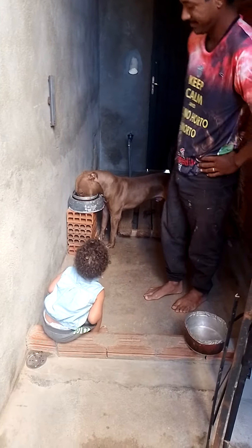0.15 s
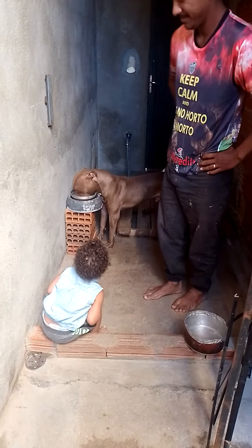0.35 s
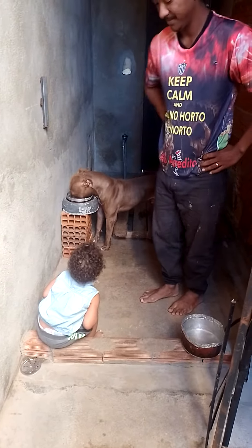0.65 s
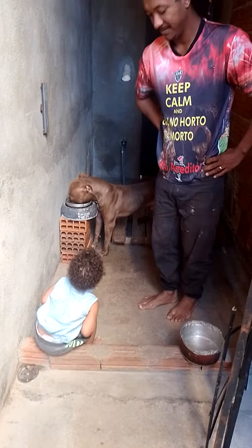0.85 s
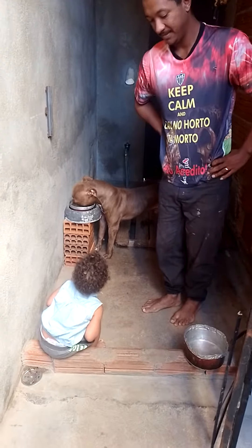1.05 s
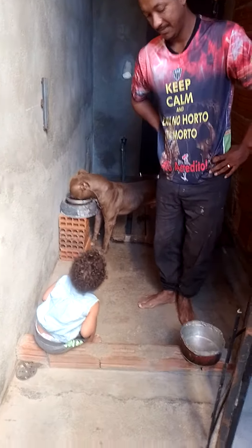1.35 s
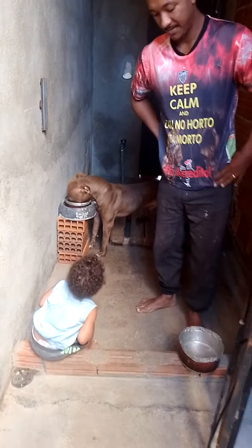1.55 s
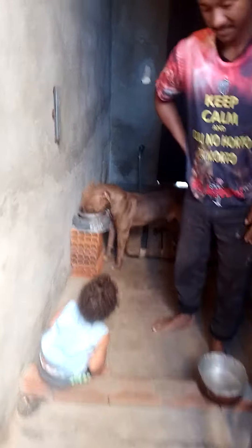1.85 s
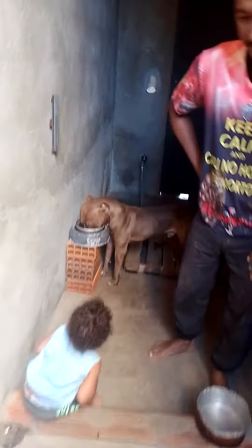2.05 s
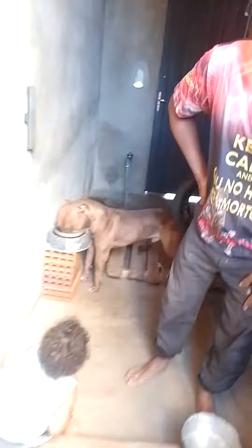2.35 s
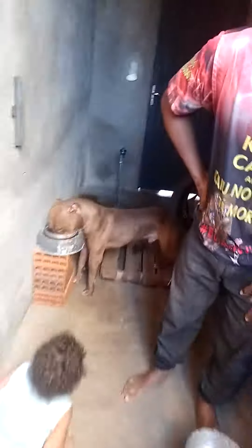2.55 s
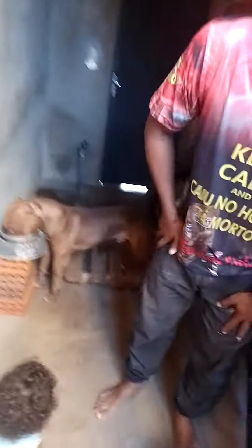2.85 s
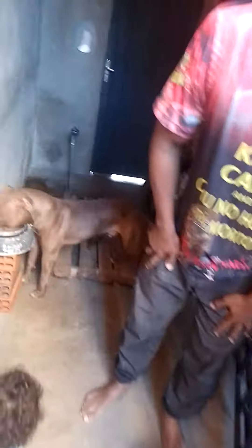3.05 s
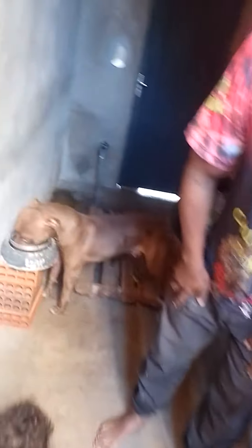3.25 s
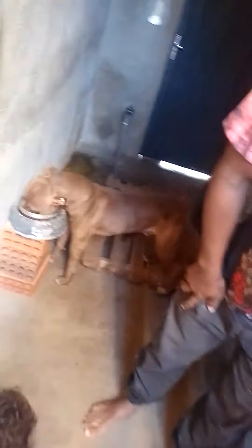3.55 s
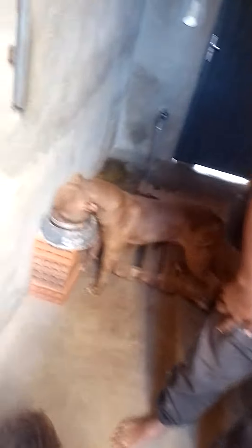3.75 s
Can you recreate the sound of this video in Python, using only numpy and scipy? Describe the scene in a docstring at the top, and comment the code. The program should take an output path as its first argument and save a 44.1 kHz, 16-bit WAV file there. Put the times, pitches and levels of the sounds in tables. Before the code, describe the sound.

Dry pellets crunch, snap and scrape as a dog eats from a metal bowl, which rings briefly and clatters on a brick. The eating eases, then grows busier, heard a few metres away in a quiet concrete yard.

```python
"""Dog rooting through kibble

A muzzle pushes dry pellets around a metal bowl on a hollow brick, in a walled concrete yard.
The pellets crunch in dense grains, rub the bowl into ringing, snap singly and ping on the rim;
the bowl knocks and chatters on the brick. A mono phone a few metres away also picks up
faint hiss, wind and handling rumble, and one finger tap."""
import sys
import numpy as np
from scipy import signal
from scipy.fft import rfft, irfft
from scipy.io import wavfile
from scipy.ndimage import uniform_filter1d

SR = 44100
rng = np.random.default_rng(int(sys.argv[2]) if len(sys.argv) > 2 else 0)


def transcribe(u):
    """Save the signal u as a 16-bit wav file named by the first command-line argument.

    u: samples, shape (n,) or (channels, n), limited to [-1, 1]; the rate is SR.
    q: integer samples, one column per channel.
    """
    v = np.clip(np.atleast_2d(u).T, -1, 1)
    q = np.round(v * 32767).astype(np.int16)
    wavfile.write(sys.argv[1], SR, q)


N = 171990


def undb(db):
    return 10 ** (np.asarray(db) / 20)


def unit(x):
    return x / np.sqrt(np.mean(x ** 2))


def unit_onset(x, onset_s):
    """Scale to RMS 1 over the first onset_s."""
    return x / np.sqrt(np.mean(x[:int(onset_s * SR)] ** 2))


def band(x, lo_hz, hi_hz, order=2):
    sos = signal.butter(order, [lo_hz, min(hi_hz, SR / 2.2)], "band", fs=SR, output="sos")
    return signal.sosfilt(sos, x)


def colour(x, spectrum):
    """Shape to (f/Hz, gain/dB) points; RMS 1."""
    hz, db = np.array(spectrum).T
    bins_hz = np.maximum(np.arange(len(x) // 2 + 1) * SR / len(x), 1)
    gain_db = np.interp(np.log(bins_hz), np.log(hz), db, left=-80)
    return unit(irfft(rfft(x) * undb(gain_db), len(x)))


def grains(n, per_s, spread_db):
    """Random clicks, a few much larger than the rest."""
    clicks = (rng.random(n) < per_s / SR) * rng.standard_normal(n)
    return clicks * undb(spread_db * np.minimum(rng.exponential(size=n), 5))


def fade(n, t60_s):
    return np.exp(-np.log(1000) * np.arange(n) / SR / max(t60_s, 1e-3))


def drift(rate_hz):
    """Smooth random wander; RMS 1."""
    hold = int(SR / rate_hz)
    steps = np.repeat(rng.standard_normal(N // hold + 1), hold)
    return unit(uniform_filter1d(uniform_filter1d(steps, hold), hold)[:N])


def add(out, at_s, x):
    i = int(at_s * SR)
    out[i:i + len(x)] += x[:N - i]


def crowded_modes(envelope, spacing_hz=90, depth_db=3.5, drift_db=7):
    """Noise coloured by the bowl's dense upper modes; five sets take turns as the muzzle moves."""
    bins_hz = np.arange(N // 2 + 1) * SR / N
    grid_hz = np.arange(0, SR / 2, spacing_hz)
    out, power = 0, 0
    for _ in range(5):
        share = undb(drift_db * drift(rate_hz=7.976))
        peaks = np.clip(rng.standard_normal(len(grid_hz)), -2, 1.5)
        ripple = undb(depth_db * np.interp(bins_hz, grid_hz, peaks))
        noise = envelope * rng.standard_normal(N)
        out += share * unit(irfft(rfft(noise) * ripple, N))
        power += share ** 2
    return out / np.sqrt(power)


# Bowl modes: f/Hz, level/dB, t60/s
BOWL_MODES = [(434, 2, 0.18), (485, 0, 0.15), (522, -3, 0.15), (600, -1, 0.13), (652, 0, 0.12),
              (746, 1.5, 0.08), (860, 1, 0.12), (960, 2, 0.12), (1136, 2.5, 0.068), (1320, 2.5, 0.015),
              (1383, -3.5, 0.02), (1580, 8, 0.042), (1642, 6, .1), (1740, -2.5, 0.013), (1995, -5, 0.12),
              (2240, -23, 0.016)]
LOW_TOP_HZ, MID_TOP_HZ = 690, 1350


def bowl(force, group, offsets_db, detunes, t60_scale):
    """A force rings the low (0), mid (1) or high (2) modes; the deep bass is removed."""
    out = 0
    for (hz, db, t60_s), offset_db, detune in zip(BOWL_MODES, offsets_db, detunes):
        if int(hz > LOW_TOP_HZ) + int(hz > MID_TOP_HZ) == group:
            radius = np.exp(-np.log(1000) / (max(t60_s * t60_scale, 0.005) * SR))
            angle = 2 * np.pi * hz * (1 + detune) / SR
            gain = rng.choice([-1, 1]) * undb(db + offset_db) * np.sqrt(1 - radius) * np.sin(angle)
            out += gain * signal.lfilter([1], [1, -2 * radius * np.cos(angle), radius ** 2], force)
    return signal.sosfilt(signal.butter(4, 340, "high", fs=SR, output="sos"), out)


# Crunch spectrum: f/Hz, gain/dB
CRUNCH_SPECTRUM = [(710, -35.5), (1200, -5.5), (1620, -15), (1750, -6.5), (2520, -4.5), (2900, -3.5),
                   (3590, -4), (4720, -2), (5750, -2), (6520, -2), (7280, -5.5), (7880, -43), (10200, -58),
                   (17300, -120)]
# Muzzle pushes: t/s, crunch level/dB, mid ring/dB re crunch, high ring/dB re crunch
MUZZLE_PUSHES = [(0.0, -42.5, -5, -28), (0.08, -49, -9.5, -8), (0.1, -42, -17, -25.5),
                 (0.191, -54.5, -18, -4), (0.22, -38, -3, -24), (0.25, -36.5, -4, -3.5),
                 (0.35, -44.5, -9, -11), (0.385, -57.5, -15, -8), (0.41, -47.5, -20, -15),
                 (0.499, -49, -14.5, -12.5), (0.598, -29.5, -20, -23), (0.67, -36, -8, -9),
                 (0.72, -43, -13, -12), (0.75, -54.5, -3.5, -7.5), (0.93, -59.5, -13, -10.5),
                 (0.98, -71, -3, -13), (1.055, -80, 1, -2), (1.065, -61, 4, -23), (1.14, -51, -10, -27),
                 (1.181, -68.5, -8, -23), (1.27, -45.5, -11.5, -9.5), (1.408, -37, -4, -14),
                 (1.5, -53, -5, -14), (1.54, -47, -2.5, -8), (1.65, -57.5, -11.5, -13),
                 (1.68, -47, -9.5, -44), (1.7, -46.5, -13.5, -10), (1.74, -44.5, -7.5, -5),
                 (1.77, -39, -11, -16), (1.932, -50.5, -13, -13), (2.03, -31, -18, -10.5),
                 (2.06, -34, -15, -10), (2.1, -28.5, 3, -20), (2.13, -36, -11, -16),
                 (2.19, -41.5, -6.5, -5.5), (2.313, -61.5, -3, -6), (2.319, -45, -13.5, -6.5),
                 (2.36, -47, -11, -1), (2.41, -44, -16, -13), (2.471, -58.5, -13, -12),
                 (2.512, -38.5, -9, -8), (2.57, -42.5, -23, -16), (2.62, -37.5, -20, -20),
                 (2.7, -57, -3.5, -5), (2.75, -47, -10.5, -3.5), (2.85, -55, -12, -10),
                 (2.87, -44.5, -12.5, -2.5), (2.99, -41.5, -9.5, -13), (3.04, -52.5, -4, 1),
                 (3.119, -40.5, -16.5, -8), (3.159, -52.5, -11, -1.5), (3.202, -43.5, 3, -10),
                 (3.21, -34.5, -5.5, -4), (3.24, -26, -13, -12), (3.261, -35, -5, -27),
                 (3.282, -29, -8.5, -10), (3.442, -46, -10.5, -7), (3.462, -34, -12, -14.5),
                 (3.617, -50.5, -7, 6), (3.626, -34.5, -15.5, -2), (3.66, -33.5, -16, -8),
                 (3.701, -31.5, -15.5, -5.5), (3.78, -42.5, -9, -12), (3.9, -42, -8, -6.5)]


def rooting(grain_s=0.0017, mid_cap_db=-3, low_re_mid_db=-5.5):
    """Pellets crunch and rub the bowl into a ring that they and the muzzle damp."""
    t = np.arange(N) / SR
    times_s, *levels_db = np.array(MUZZLE_PUSHES).T
    crunch_db, mid_db, high_db = (np.interp(t, times_s, column) for column in levels_db)
    contacts = lambda: grains(N, per_s=4000, spread_db=2.5)
    rattle = unit(uniform_filter1d(np.abs(contacts()), size=int(grain_s * SR) + 1))
    even = np.zeros(len(BOWL_MODES))
    low, mid, high = (unit(bowl(contacts(), group, even, even, t60_scale=0.23)) for group in range(3))
    crunch = colour(crowded_modes(rattle + 1), CRUNCH_SPECTRUM)  # grains on a steady bed
    lower_ring = undb(np.minimum(mid_db, mid_cap_db)) * (mid + undb(low_re_mid_db) * low)
    return undb(crunch_db) * (crunch + lower_ring + undb(high_db) * high)


# Yard hiss spectrum: f/Hz, gain/dB
HISS_SPECTRUM = [(15, -50.5), (25, -12.5), (97, -12.5), (186, -11), (362, -2.5), (428, 0.5), (690, -4.5),
                 (741, -9), (900, -10.5), (1350, 0.5), (1700, -30), (5370, -38), (7500, -51.5), (9750, -81),
                 (16500, -120)]


def yard_hiss(level_db=-65, flicker_db=0.5):
    """Faint, dull outdoor noise."""
    hiss = colour(rng.standard_normal(N), HISS_SPECTRUM)
    return hiss * undb(level_db + flicker_db * drift(rate_hz=16))


# Rumble envelope: t/s, level/dB
RUMBLE_LEVELS = [(0.0, -85), (0.24, -73.5), (0.71, -62), (0.93, -65), (1.09, -65), (1.78, -74.5),
                 (1.92, -72.5), (2.18, -55.5), (2.709, -72), (3.33, -60), (3.41, -58), (3.9, -59.5)]


def rumble(centre_hz=82.4, flicker_db=3):
    """Low, unsteady noise of wind and handling."""
    level_db = np.interp(np.arange(N) / SR, *np.array(RUMBLE_LEVELS).T)
    level_db += flicker_db * drift(rate_hz=12)
    noise = band(rng.standard_normal(N), centre_hz / 2, 2 * centre_hz, order=1)
    return undb(level_db) * unit(noise)


# Bowl on brick: t/s, blow peak/dB, low, mid, high ring/dB, thud/dB, chatter t60/s, free f/Hz
BRICK_KNOCKS = [(0.009, -60, -63, -62.5, -59, -62, 0.17, 520),
                (0.209, -39, -42, -36.5, -53, -47.5, 0.26, 613),
                (0.24, -23.5, -38, -39.5, -42.5, -51.5, 0.12, 617),
                (0.258, -30, -41, -52, -52, -56, 0.2, 550), (0.639, -38, -61, -57, -63, -58.5, 0.12, 520),
                (0.669, -39, -49, -57, -55.5, -63, 0.11, 505), (1.359, -29, -48, -58, -46, -57, 0.116, 600),
                (1.399, -38, -34, -40, -64, -53.5, 0.2, 510), (1.988, -43, -62, -40, -53, -66.5, 0.22, 520),
                (2.015, -20, -32.5, -40, -31.5, -62, 0.18, 449),
                (2.034, -32, -42.5, -37.5, -38.5, -65, 0.17, 463),
                (2.086, -22, -35, -36, -34, -55, 0.08, 480), (2.103, -28, -34, -32, -46, -55, 0.12, 520),
                (2.497, -43, -59, -58.5, -64, -63, 0.12, 480), (2.53, -36, -43.5, -59, -48, -65, 0.2, 430),
                (2.564, -24, -40, -42.5, -53, -76, 0.18, 435), (2.588, -33, -46, -52, -56, -65, 0.17, 430),
                (2.964, -38.5, -44.5, -57, -56, -51.5, 0.073, 470),
                (2.983, -33, -46.5, -63, -69, -60, 0.13, 520), (3.213, -21, -35, -29, -31, -50, 0.14, 600),
                (3.233, -18, -32, -29, -32.5, -53, 0.1, 610),
                (3.457, -32, -44.5, -42, -41.5, -52.5, 0.3, 560),
                (3.694, -48, -47.5, -42.5, -43.5, -50.5, 0.27, 540)]


def knocks(grip_db_per_octave=-34.5, detune_spread=0.0084, thud_hz=161, onset_s=0.04):
    """A blow and dying chatter ring the bowl over a thud; the grip mutes low modes off the free pitch."""
    out, n = np.zeros(N), SR // 2
    for at_s, blow_db, *rings_db, thud_db, t60_s, free_hz in BRICK_KNOCKS:
        force = grains(n, per_s=2000, spread_db=1.5)
        force[0] = 2.5  # first contact
        force *= fade(n, t60_s)
        spot_db = rng.standard_normal(len(BOWL_MODES))  # the struck spot favours some modes
        detunes = detune_spread * rng.standard_normal(len(BOWL_MODES))
        grip_db = [grip_db_per_octave * abs(np.log2(hz / free_hz)) * (hz < LOW_TOP_HZ)
                   for hz, _, _ in BOWL_MODES]
        ring = 0
        for group, db in enumerate(rings_db):
            modes = bowl(force, group, spot_db + grip_db, detunes, t60_scale=0.76)
            ring += undb(db) * unit_onset(modes, onset_s)
        thud = undb(thud_db) * unit_onset(band(force, thud_hz / 1.13, thud_hz * 3.2), onset_s)
        blow = band(rng.standard_normal(n), 540, 1000) * fade(n, t60_s=0.0053)
        add(out, at_s, ring + thud + undb(blow_db) * blow / np.abs(blow).max())
    return out


# Pellet snaps, and at 2.937 s the finger tap's second, broad click: t/s, relative level/dB, f/Hz, width/f,
# t60/s
PELLET_SNAPS = [(0.0885, -30, 5470, 0.3, 0.065), (0.2093, -33, 2890, 0.45, 0.055),
                (0.2373, -22.5, 2800, 0.21, 0.078), (0.5467, -30, 5300, 0.67, 0.077),
                (0.582, -20.5, 5800, 0.25, 0.091), (0.5926, -30, 6380, 0.41, 0.063),
                (0.6417, -25.5, 5700, 0.12, 0.058), (0.7884, -37.5, 5440, 0.35, 0.068),
                (0.9094, -43, 5900, 0.28, 0.085), (0.997, -54, 2780, 0.29, 0.063),
                (1.062, -61, 5710, 0.4, 0.05), (1.1962, -42.5, 5560, 0.3, 0.028),
                (1.223, -41.5, 4060, 0.24, 0.05), (1.2525, -36, 6000, 0.48, 0.058),
                (1.296, -25.5, 5500, 1, 0.022), (1.3587, -26, 5830, 0.24, 0.08),
                (1.4003, -28, 5900, 0.4, 0.12), (1.6642, -38.5, 6300, 0.21, 0.31),
                (1.7198, -28, 5300, 0.25, 0.063), (1.7373, -13.5, 6500, 0.14, 0.03),
                (1.755, -25, 6180, 0.35, 0.056), (1.813, -26, 6470, 0.18, 0.078),
                (1.966, -27.5, 5470, 0.35, 0.02), (2.016, -17.5, 5400, 0.32, 0.039),
                (2.0885, -14.5, 5140, 0.12, 0.031), (2.3199, -25.5, 5300, 0.22, 0.022),
                (2.4947, -31, 4960, 0.4, 0.15), (2.5618, -26.5, 5900, 0.42, 0.24),
                (2.741, -30, 6600, 0.18, 0.054), (2.8593, -30, 6450, 0.061, 0.055),
                (2.9033, -29, 6550, 0.45, 0.046), (2.937, -28, 1500, 1, 0.025),
                (3.2136, -10, 2800, 0.91, 0.031), (3.275, -24, 4030, 0.55, 0.027),
                (3.4565, -29.5, 3940, 0.18, 0.15), (3.5575, -25, 4750, 0.76, 0.016),
                (3.62, -25, 5840, 0.19, 0.03), (3.8176, -34, 5800, 0.22, 0.055)]


def snaps(broad_db=-35, tick_gain=0.21):
    """Single pellets crack: pitched noise bursts, harder and broader in the first instant. One broad row gives
    the finger tap's second click."""
    out, n = np.zeros(N), SR // 4
    for at_s, db, hz, width, t60_s in PELLET_SNAPS:
        noise = rng.standard_normal(n)
        edge_ratio = 1 + width / 2
        pitched = unit(band(noise, hz / edge_ratio, hz * edge_ratio, order=1))
        broad = unit(band(noise, 1700, 10000, order=1))
        crack = (pitched + undb(broad_db) * broad) * fade(n, t60_s)
        tick = tick_gain * broad * fade(n, t60_s=0.0025)
        add(out, at_s, undb(db) * (crack + tick) / 2)
    return out


# Rim pings and two low hollow rings: t/s, level/dB, f/Hz, t60/s
PINGS_AND_RINGS = [(0.106, -55, 2980, 0.33), (0.237, -42.5, 2940, 0.3), (.53, -49, 925, 0.37),
                   (1.519, -54, 4280, 0.21), (1.745, -44, 3800, 0.058), (1.76, -50, 1120, 0.64),
                   (2.018, -36, 5240, 0.12), (2.017, -39.5, 2600, 0.12), (2.375, -51.5, 2644, 0.18),
                   (3.214, -33.5, 3085, 0.34), (3.219, -30.5, 2587, 0.17), (3.267, -35, 4305, .16),
                   (3.302, -38, 5340, 0.15), (3.624, -39.5, 5600, 0.17), (3.65, -35.5, 4980, 0.078),
                   (3.819, -56, 6020, 0.09)]


def pings(width_hz=70, rise_s=0.004):
    """Narrow, slightly rough rings: pellets striking the rim, and two low hollow rings."""
    out, n = np.zeros(N), SR // 2
    attack = 1 - np.exp(-np.arange(n) / SR / rise_s)
    for at_s, db, hz, t60_s in PINGS_AND_RINGS:
        noise = band(rng.standard_normal(n), hz - width_hz / 2, hz + width_hz / 2, order=1)
        ring = noise * attack * fade(n, t60_s)
        add(out, at_s, undb(db) * unit_onset(ring, onset_s=0.03))
    return out


def finger_tap(at_s=2.9305, gain_db=-20.5, dip_s=0.0004, rebound_hz=118):
    """A finger taps the phone: a sharp dip, then a slow rebound; its second, broad click is played with the
    snaps."""
    out, t = np.zeros(N), np.arange(SR // 10) / SR
    dip = t / dip_s * np.exp(1 - t / dip_s)
    rebound = 0.45 * np.sin(2 * np.pi * rebound_hz * t) * fade(len(t), t60_s=0.019)
    add(out, at_s, undb(gain_db) * (rebound - dip))
    return band(out, 60, 8000)


def walls(direct, level_db=-12, t60_s=0.37, gap_s=0.00451):
    """The concrete walls return a short, diffuse tail."""
    tail = rng.standard_normal(SR // 2) * fade(SR // 2, t60_s)
    tail[:int(gap_s * SR)] = 0
    tail /= np.sqrt(np.sum(tail ** 2))
    return undb(level_db) * signal.fftconvolve(direct, tail)[:N]


def scene():
    """Dog, reflections, tap and background; two identical channels."""
    dog = rooting() + knocks() + snaps() + pings()
    mono = dog + walls(dog) + finger_tap() + yard_hiss() + rumble()
    return np.tile(mono, (2, 1))


def record(dry, low_cut_hz=66, rolloff_hz=6603, top_hz=7550):
    """The phone loses the deep bass, rolls off the treble, then cuts the top."""
    thin = signal.sosfilt(signal.butter(2, low_cut_hz, "high", fs=SR, output="sos"), dry)
    soft = signal.sosfilt(signal.butter(12, rolloff_hz, fs=SR, output="sos"), thin)
    return signal.sosfilt(signal.ellip(8, 0.5, 40, top_hz, fs=SR, output="sos"), soft)


dry = scene()
out = record(dry)
transcribe(out)
```